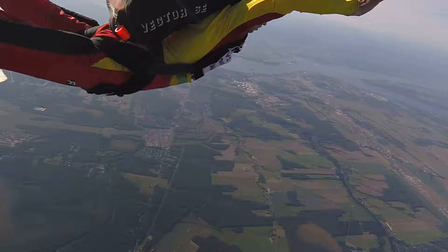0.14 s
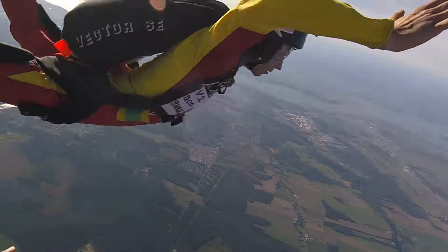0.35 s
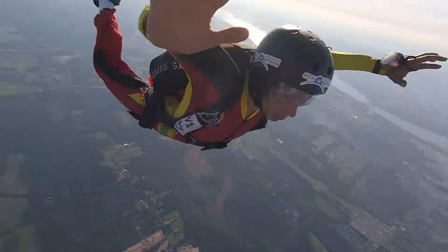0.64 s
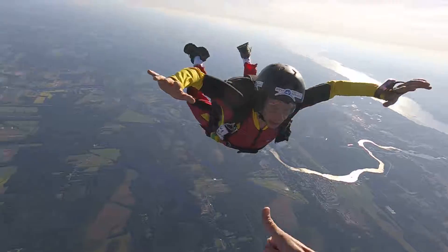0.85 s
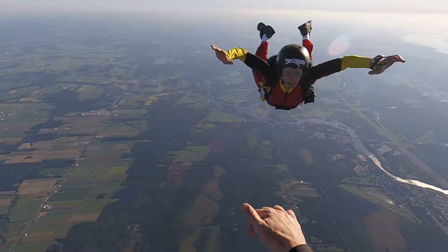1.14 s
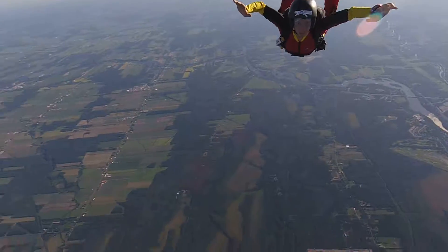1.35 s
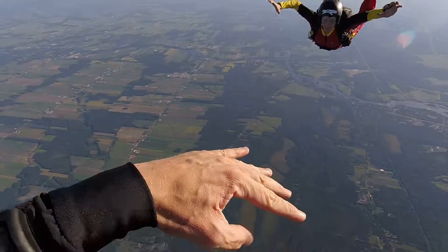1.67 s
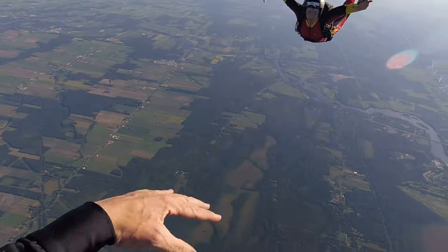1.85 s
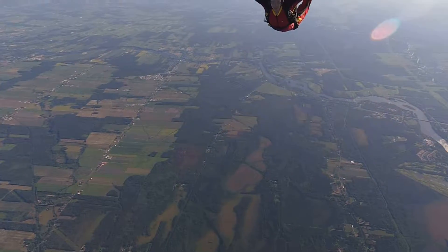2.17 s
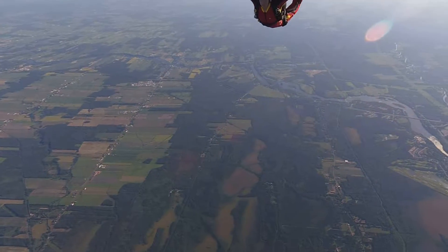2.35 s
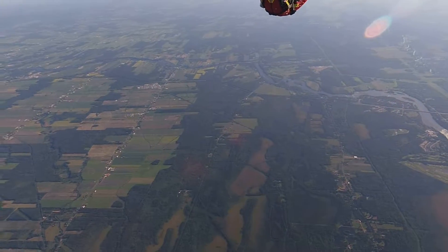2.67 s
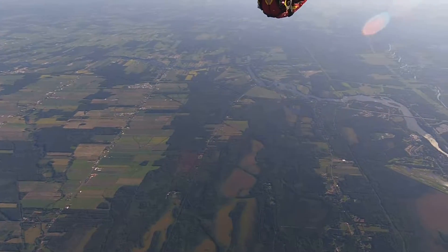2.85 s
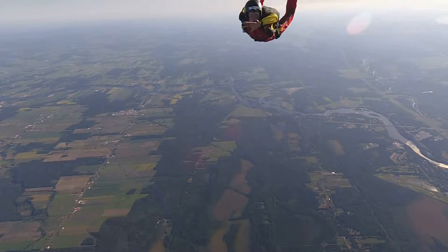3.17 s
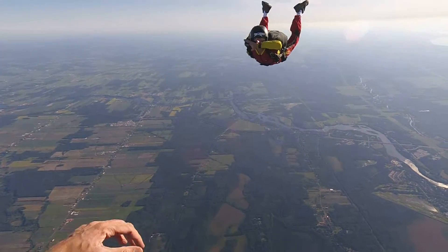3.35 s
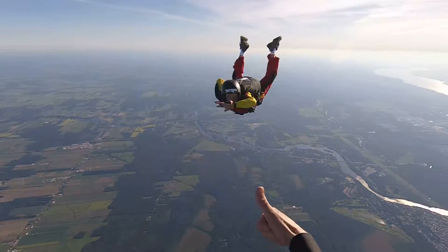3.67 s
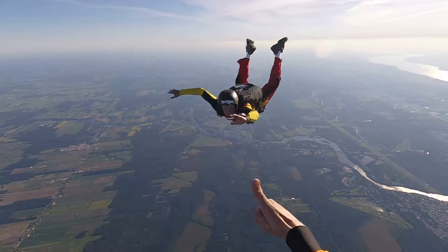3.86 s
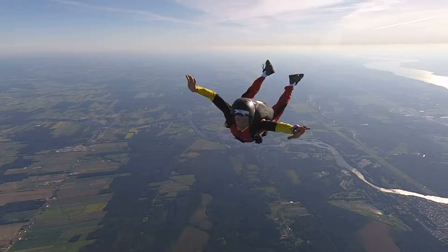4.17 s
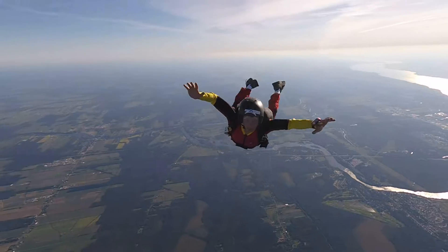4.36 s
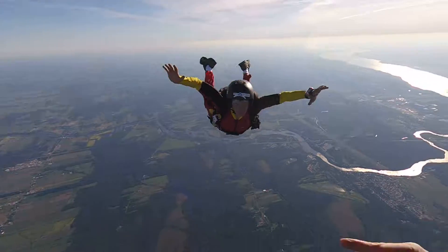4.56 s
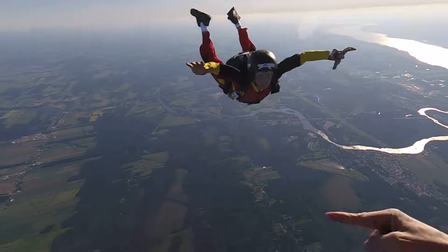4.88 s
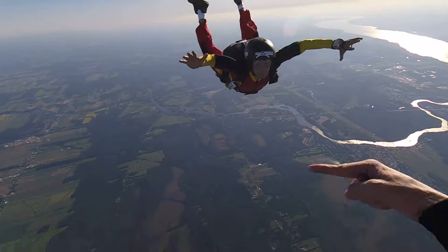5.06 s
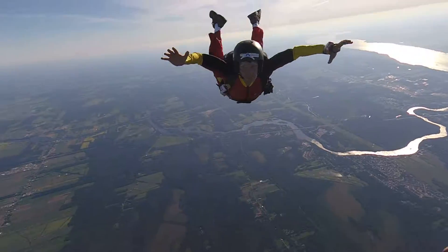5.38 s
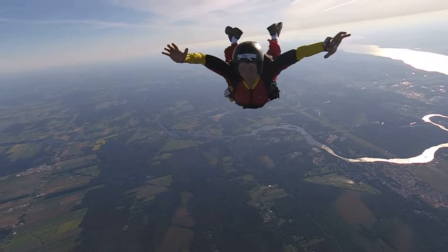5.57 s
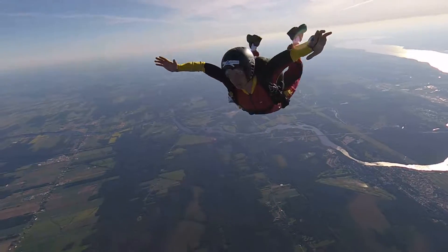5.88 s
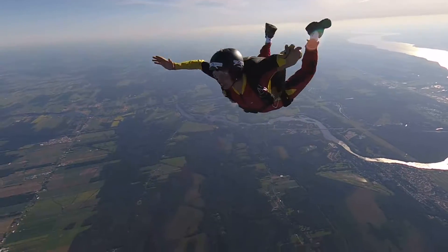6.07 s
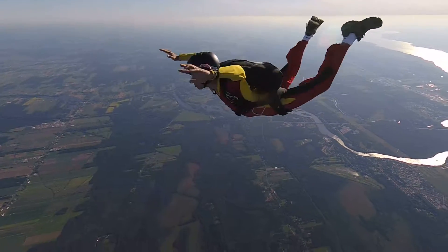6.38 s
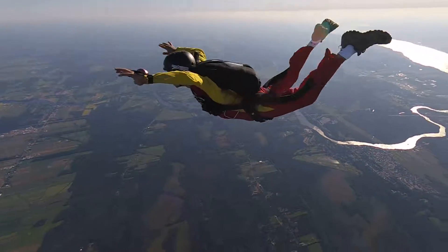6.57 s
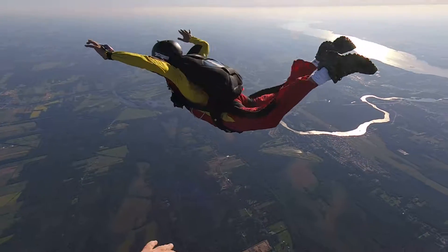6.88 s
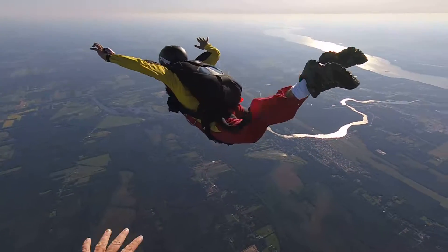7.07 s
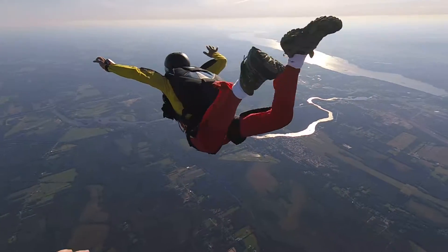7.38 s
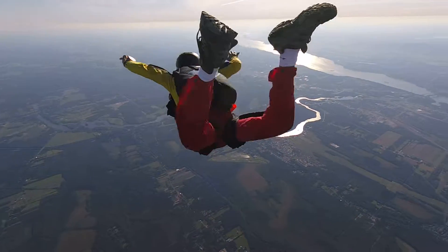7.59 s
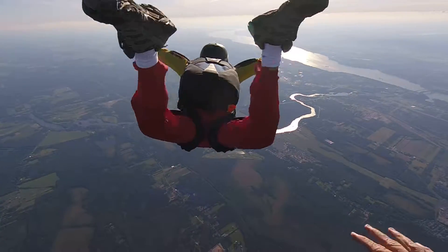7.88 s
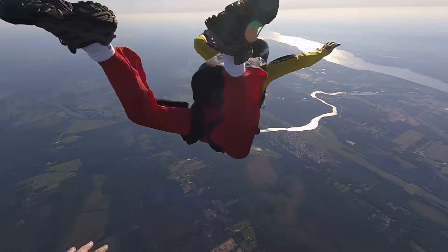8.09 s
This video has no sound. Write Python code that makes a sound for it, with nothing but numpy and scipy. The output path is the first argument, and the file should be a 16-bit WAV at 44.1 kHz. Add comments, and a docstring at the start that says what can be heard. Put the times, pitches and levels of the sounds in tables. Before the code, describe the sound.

A deep, steady roar of wind buffets a falling skydiver's microphone, broken by crackling gusts and thuds over a thin hiss.

```python
"""A deep, pounding rumble and tearing air: freefall, heard from a camera on a skydiver's helmet.
Big eddies in the helmet's wake beat on the microphone; as the head turns, the flow buffets its port
and now and then breaks away in a tearing gust, with single hard slaps. Behind that, a thin hiss from
the housing's port and edges brightens and dulls with the angle. The camera's limiter holds the peaks."""
import sys
import numpy as np
from scipy import signal
from scipy.fft import rfft, irfft, next_fast_len
from scipy.io import wavfile
from scipy.ndimage import uniform_filter1d, minimum_filter1d, map_coordinates

SR = 44100
rng = np.random.default_rng(int(sys.argv[2]) if len(sys.argv) > 2 else 0)


def waveform_to_disk(signal):
    """Save audio, clipped to [-1, 1], as 16-bit WAV at the path in sys.argv[1]."""
    frames = np.transpose(np.atleast_2d(signal))
    scaled = np.clip(frames, -1, 1) * 32767
    samples = np.round(scaled).astype(np.int16)
    wavfile.write(sys.argv[1], SR, samples)


N = 362943

# The wake, just behind the helmet: t/s, shedding f/Hz (used relative to its mean), rumble level/dB
WAKE = [(0, 82.15, -12), (0.65, 90.84, -10.5), (0.95, 73.63, -12.5), (1.35, 102.2, -10.5),
        (1.56, 81.61, -14), (1.75, 106.5, -12.5), (2.05, 95.4, -11), (2.65, 83.41, -11.5),
        (2.85, 99.19, -11), (3.35, 74.07, -12), (3.62, 86.04, -11.5), (3.95, 71.74, -9), (4.25, 82.3, -15),
        (4.75, 82.09, -9.5), (5.2, 63.87, -11), (5.47, 85.97, -16.5), (5.7, 68.11, -13), (6.0, 78, -12),
        (6.25, 99.27, -10), (6.55, 80.31, -11), (6.85, 90.64, -10.5), (7.3, 69.03, -14), (8.22, 67.97, -13)]
# Spectra of the rumble at mean pace and of the throb beneath it: f/Hz, level/dB
RUMBLE_SPECTRUM = [(18, -31), (28, -10), (48, -2.5), (78, -1.5), (112, -2.5), (145, -9), (220, -28),
                   (400, -42), (1000, -115)]
THROB_SPECTRUM = [(10, -26), (18, -8), (28, 10), (45, 10.5), (70, 4.5), (400, -110)]
def wake():
    """The helmet sheds eddies; a weaker rumble means larger, slower ones, so the deep throb grows."""
    shed_hz, rumble_db = curves(WAKE)
    swings = pressure_swings(RUMBLE_SPECTRUM, evenness=0.38, pace=shed_hz / shed_hz.mean())
    throb = pressure_swings(THROB_SPECTRUM, evenness=0.43) * amp(-22.5 - about_mean(rumble_db))
    return throb + amp(rumble_db) * swings, swings


def pressure_swings(spectrum, evenness, pace=1):
    """Large eddies pass the microphone one after another, their loudness held fairly even; pace speeds them up."""
    noise = map_coordinates(rush(spectrum), [np.cumsum(pace * np.ones(N))], order=3, mode="mirror")
    power = uniform_filter1d(np.abs(signal.hilbert(noise)) ** 2, size=1100)
    return unit(noise / (power + 0.036) ** (evenness / 2))


# Unsteady flow right on the microphone port: t/s, level/dB
BUFFETING = [(0, -26), (1.4, -22), (1.58, -18.5), (1.71, -16), (2.0, -20), (2.19, -15.5), (2.82, -21),
             (3.05, -26), (4.05, -28), (4.17, -20.5), (4.95, -23.5), (5.68, -24), (5.8, -17.5),
             (6.1, -23.5), (6.24, -15.5), (6.8, -27.5), (7.25, -29.5), (8.23, -22.5)]
# Its spectrum: f/Hz, level/dB
BUFFET_SPECTRUM = [(60, -26), (130, -2), (200, 1), (300, -8.5), (450, -16.5), (800, -27.5), (1600, -51),
                   (4000, -85.5)]
def buffeting(eddies_db):
    """Harder buffeting sheds smaller eddies and sounds brighter. Returns sound and level swing in dB."""
    level_db, = curves(BUFFETING)
    swing_db = about_mean(level_db)
    roar = brightened(rush(BUFFET_SPECTRUM), corner_hz=284, gain_db=0.61 * swing_db)
    flutter_db = 0.5 * eddies_db + 1.46 * wobble(36)
    return amp(level_db) * unit(roar * amp(flutter_db)), swing_db


def eddy_cascade(ceiling_db=12):
    """Eddies break into smaller ones, so their strengths multiply: a level in dB, softly capped."""
    total_db = 3 * wobble(21) + 3.5 * wobble(68) + 4 * wobble(340)
    return ceiling_db * np.tanh(total_db / ceiling_db)


# Spectrum of air tearing at the port, point-blank: f/Hz, level/dB
TEARING_SPECTRUM = [(100, -22.5), (310, 11.5), (560, 4), (1020, -1.5), (1620, -9), (2520, -17.5),
                    (3620, -25), (4620, -32.5), (5700, -24.5), (7550, -30), (10100, -37.5), (13800, -51.5),
                    (15700, -81.5)]
def tearing(level_db, eddies_db, swings, hiss_hz, ceiling_db=-18, sheen_db_per_octave=16):
    """The flow tears in fine, crackling bursts, most at the crest of each big pressure swing."""
    bursts = amp(level_db) * unit(amp(eddies_db + 1.8 * swings))
    bursts = bursts / np.hypot(1, bursts / amp(ceiling_db))  # the strongest gusts level off
    # each burst has its own share of the finest eddies: some dull, some crisp
    tear = brightened(bursts * rush(TEARING_SPECTRUM), corner_hz=2730, gain_db=4.5 * wobble(160) - 2.5)
    fine_air = unit(above(rush(TEARING_SPECTRUM), corner_hz=1187))
    crackle = fine_air * snaps(per_second=90, scatter_db=5.5, rise_s=0.00041) * amp(level_db - 18.5)
    sheen_db = sheen_db_per_octave * about_mean(np.log2(hiss_hz))  # the top follows the edge hiss
    return brightened(tear + crackle, corner_hz=7800, gain_db=sheen_db)


def snaps(per_second, scatter_db, rise_s):
    """Tiny eddies flick past at random: an envelope of very short cracks, rms 1."""
    chance, size = rng.random(N), rng.standard_normal(N)
    flicks = (chance < per_second / SR) * amp(scatter_db * np.clip(size, -2, 2))
    return unit(signal.fftconvolve(flicks, swell(rise_s, SR // 50))[:N])


# Gusts at the port: t/s, hold/s, extra tearing/dB, extra port hiss/dB
GUSTS = [(0.0, 0.053, 6.5, 5), (0.706, 0.14, 4.5, 2), (1.041, 0.045, 8, 6), (1.41, 0.097, 9, 5),
         (2.037, 0.43, 8.5, 3.5), (2.135, 0.13, 6, 0), (2.466, 0.22, 3.5, -1), (3.422, 0.095, 3.5, 3),
         (4.35, 0.02, 7.5, 1), (4.703, 0.052, 12, 6), (4.849, 0.012, 9, -2), (4.922, 0.076, 12, 4),
         (5.3, 0.097, 3.5, 1), (5.772, 0.15, 5, -4), (6.28, 0.16, 5, 1), (6.545, 0.12, 5, -1),
         (8.037, 0.21, 1.5, 1)]
def gusts():
    """The flow breaks away, holds and settles: extra tearing and extra port hiss in dB."""
    return sum(np.outer(levels_db, plateau(start, hold, attack_s=0.031, release_s=0.047))
               for start, hold, *levels_db in GUSTS)


# Lulls around the helmet: t/s, hold/s, change in buffeting and tearing/dB
LULLS = [(0.656, 0.025, -4), (1.535, 0.076, -7), (3.797, 0.09, -5.5), (4.436, 0.062, -2.5),
         (5.403, 0.013, -11.5), (6.702, 0.27, -2.5)]
def lulls():
    """The flow slackens briefly: a level change in dB."""
    return sum(db * plateau(start, hold, attack_s=0.012, release_s=0.012) for start, hold, db in LULLS)


# Direct hits on the port: t/s, rise/s, crest level/dB (before thud and body weights), crisp crest/dB
SLAPS = [(0.456, 0.0011, -20.5, -43), (0.625, 0.0031, -21.5, -41.5), (0.709, 0.0035, -27.5, -45),
         (0.781, 0.0018, -33, -57), (0.85, 0.002, -30, -43), (1.033, 0.0023, -25, -44),
         (1.373, 0.00058, -19.5, -40), (1.412, 0.0045, -18.5, -37.5), (2.079, 0.00091, -17, -44.5),
         (2.104, 0.005, -19, -38.5), (2.178, 0.002, -24, -35), (2.21, 0.0013, -19.5, -36),
         (2.248, 0.001, -19.5, -34), (2.274, 0.00088, -14, -36), (2.284, 0.0006, -16.5, -34),
         (2.406, 0.0031, -18, -47), (2.602, 0.001, -16.5, -34.5), (3.342, 0.0025, -26.5, -45.5),
         (3.435, 0.0023, -25.5, -45.5), (3.646, 0.0021, -20.5, -45), (4.028, 0.0017, -21.5, -49),
         (4.191, 0.0023, -22.5, -33.5), (4.209, 0.0024, -22, -48), (4.329, 0.0015, -24, -42),
         (4.553, 0.0034, -24.5, -37.5), (4.665, 0.0024, -17, -32), (4.711, 0.0024, -21.5, -42),
         (4.735, 0.0038, -20.5, -34), (4.848, 0.0047, -19.5, -39), (5.311, 0.0052, -24.5, -43),
         (5.49, 0.0011, -26, -53), (5.557, 0.0025, -25, -60), (5.696, 0.0018, -23, -39.5),
         (5.812, 0.0026, -17, -36), (5.863, 0.0039, -16.5, -40.5), (5.977, 0.0023, -19, -40.5),
         (6.282, 0.0034, -26, -39), (6.321, 0.00054, -34, -36), (6.37, 0.00059, -22, -33),
         (6.401, 0.0016, -23.5, -39), (6.409, 0.0011, -17.5, -33.5), (7.211, 0.0021, -28, -47.5),
         (7.318, 0.0032, -30.5, -57), (7.388, 0.0021, -27.5, -65), (7.464, 0.0035, -26, -39),
         (7.544, 0.0031, -24.5, -49), (7.608, 0.0034, -25, -45), (8.06, 0.0035, -23, -42),
         (8.146, 0.0037, -24, -49)]
def slaps(thud_db=2.5, body_db=-3, ragged_db=4):
    """Single hard eddies hit the port: a ragged swell with a thud, a body and a crisp top."""
    air = rush(TEARING_SPECTRUM) * amp(ragged_db * wobble(430))
    upper, crisp = above(air, corner_hz=525), above(air, corner_hz=3230)
    thud, body = air - upper, upper - crisp
    out = np.zeros(N)
    for start, rise_s, level_db, crisp_db in SLAPS:
        envelope = swell(rise_s, SR // 20)
        span = round(start * SR) + np.arange(len(envelope))
        for band, db in (thud, level_db + thud_db), (body, level_db + body_db), (crisp, crisp_db):
            burst = envelope * band[span]
            out[span] += amp(db) * burst * np.linalg.norm(envelope) / np.linalg.norm(burst)
    return out


def stalls(depth_db=-4.5, half_length_s=0.013):
    """The flow stalls just before each slap: a dip in the tearing, in dB."""
    centres = np.zeros(N)
    centres[[round((start - half_length_s / 2) * SR) for start, *_ in SLAPS]] = 1
    dips = signal.fftconvolve(centres, np.hanning(2 * half_length_s * SR), "same")
    return depth_db * np.minimum(1, dips)


# Air skimming the housing, right beside the microphone: t/s, level/dB, centre f/Hz
SKIMMING = [(0, -58, 8100), (.66, -60.5, 7800), (1.06, -59.5, 8430), (1.42, -56.5, 8340),
            (1.56, -62.5, 7600), (1.95, -62.5, 7840), (2.16, -59.5, 6800), (2.5, -62, 6300),
            (3.25, -67, 6700), (3.35, -62, 8700), (4.1, -54, 7800), (4.65, -48, 7500), (4.78, -53.5, 7620),
            (4.97, -55, 8060), (5.1, -59.5, 7640), (5.4, -57.5, 8800), (5.8, -52, 8200), (6.1, -57, 8670),
            (6.28, -56, 9100), (6.42, -57, 8500), (6.47, -58, 6400), (6.9, -68, 6100), (7.05, -65.5, 9100),
            (7.5, -59.5, 8300), (8.23, -54, 8600)]
# Its spectrum before the sweep: f/Hz, level/dB
EDGE_SPECTRUM = [(3000, -31.5), (4800, -12.5), (5800, 1.5), (8200, -1), (10400, -3.5), (11900, -11),
                 (14000, -29.5), (15700, -66)]
def edge_hiss():
    """Air hisses over the edges, its pitch moving as the head turns. Returns sound, dB swing, centre."""
    level_db, centre_hz = curves(SKIMMING)
    hiss = swept(rush(EDGE_SPECTRUM), centre_hz, width_octaves=0.27, skirt_db=-9)
    return amp(level_db) * hiss, about_mean(level_db), centre_hz


# Spectrum of the faint hiss inside the microphone port: f/Hz, level/dB
PORT_SPECTRUM = [(500, -5), (2000, -0.5), (3520, -9.5), (4620, -14.5), (5350, -5.5), (5850, -3),
                 (6720, -11), (8520, -27), (15700, -62.5)]
def port_hiss(level_db):
    """Fast air hisses in the port at a steady pitch."""
    return amp(level_db) * rush(PORT_SPECTRUM)


def amp(db):
    """Decibels to gain."""
    return 10 ** (np.asarray(db) / 20)


def unit(x):
    """Scale to rms 1."""
    return x / np.sqrt(np.mean(x ** 2) + 1e-20)


def about_mean(curve):
    """A curve's rise and fall about its mean."""
    return curve - curve.mean()


def curves(rows):
    """One value per sample for each column after the time."""
    times, *columns = np.transpose(rows)
    return [np.interp(np.arange(N) / SR, times, column) for column in columns]


def wobble(rate):
    """A smooth random curve of rms 1, rate knots a second."""
    knots = rng.standard_normal(N // 20)
    return unit(map_coordinates(knots, [np.arange(N) * rate / SR + 2], mode="wrap"))


def swell(rise_s, samples):
    """An envelope that rises quickly to 1 and falls more slowly."""
    age = np.arange(samples) / SR / rise_s
    return age * np.exp(1 - age)


def plateau(start, hold_s, attack_s, release_s):
    """An envelope that reaches 1 at start, holds and dies away."""
    t = np.arange(N) / SR - start
    return np.clip(np.minimum(1 + t / attack_s, 1 - (t - hold_s) / release_s), 0, 1)


def filtered(x, response):
    """x shaped by a gain that depends on frequency."""
    size = next_fast_len(N + 8192)
    return irfft(rfft(x, size) * response(np.fft.rfftfreq(size, 1 / SR)), size)[:N]


def rush(spectrum):
    """Noise of rms 1 with a spectrum of (f/Hz, level/dB) points."""
    points_hz, db = np.transpose(spectrum)
    white = rng.standard_normal(N)
    return unit(filtered(white, lambda hz: amp(np.interp(np.log(hz + 1), np.log(points_hz), db))))


def above(x, corner_hz):
    """The part of x above the corner."""
    return filtered(x, lambda hz: 1 / (1 + (corner_hz / (hz + 1)) ** 4))


def brightened(x, corner_hz, gain_db):
    """Everything above the corner follows a gain curve."""
    return x + above(x, corner_hz) * (amp(gain_db) - 1)


def swept(x, centre_hz, width_octaves, skirt_db):
    """x through a broad hump that follows a moving centre, over a level skirt; rms 1."""
    hz, t, frames = signal.stft(x, SR, nperseg=256)
    octaves = np.log2((hz[:, None] + 1) / np.interp(t, np.arange(N) / SR, centre_hz))
    hump = np.exp(-.5 * (octaves / width_octaves) ** 2)
    return unit(signal.istft(frames * np.hypot(hump, amp(skirt_db)))[1][:N])


def scene():
    """Open sky, one microphone on the helmet; buffeting, skimming and gusts drive tearing and port hiss."""
    rumble, swings = wake()
    eddies_db = eddy_cascade()
    buffet, buffet_swing_db = buffeting(eddies_db)
    edge, skim_swing_db, hiss_hz = edge_hiss()
    gust_tear_db, gust_port_db = gusts()
    tear_db = -32.5 + 0.51 * buffet_swing_db + 0.3 * skim_swing_db + gust_tear_db + stalls()
    port_db = -53 + 0.58 * buffet_swing_db + 0.31 * skim_swing_db + gust_port_db
    tear = tearing(tear_db, eddies_db, swings, hiss_hz)
    lull_db = lulls()
    flow = amp(0.62 * lull_db) * rumble + amp(lull_db) * (buffet + tear)
    hiss = (port_hiss(port_db) + edge) * amp(1.5 * wobble(56))  # both hisses flicker together
    return (flow + slaps() + hiss)[None]


def limiter(x, ceiling_db, window_samples):
    """The gain dips just ahead of each peak that would pass the ceiling."""
    needed = np.minimum(1, amp(ceiling_db) / (np.abs(x) + 1e-9))
    return x * uniform_filter1d(minimum_filter1d(needed, window_samples), window_samples)


def record(dry):
    """The helmet camera, in mono: it limits the peaks and keeps nothing above 15.7 kHz."""
    held = limiter(dry[0], ceiling_db=-1, window_samples=400)
    return filtered(held, lambda hz: hz < 15700)[None]


dry = scene()
out = record(dry)
waveform_to_disk(out)
```